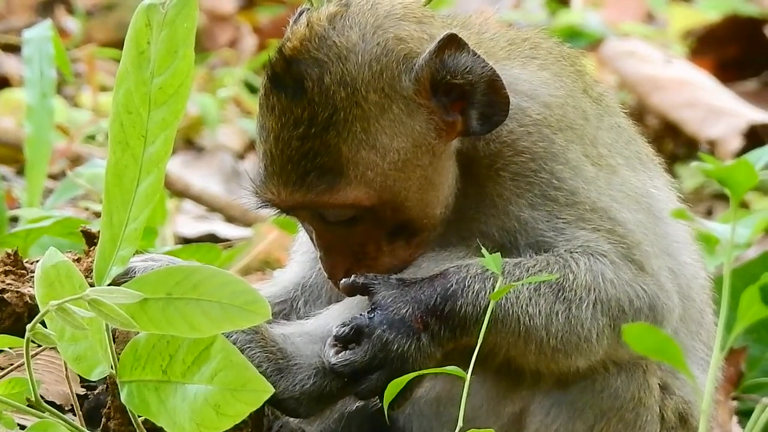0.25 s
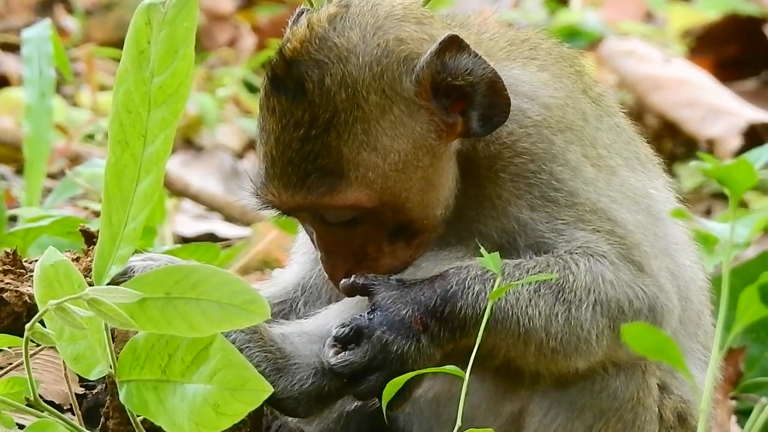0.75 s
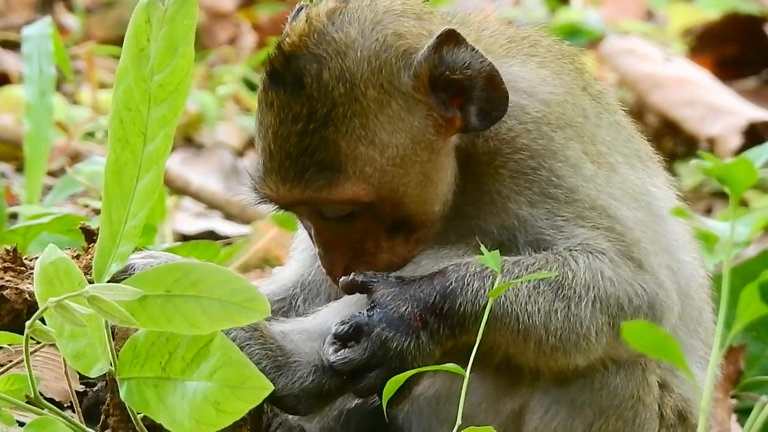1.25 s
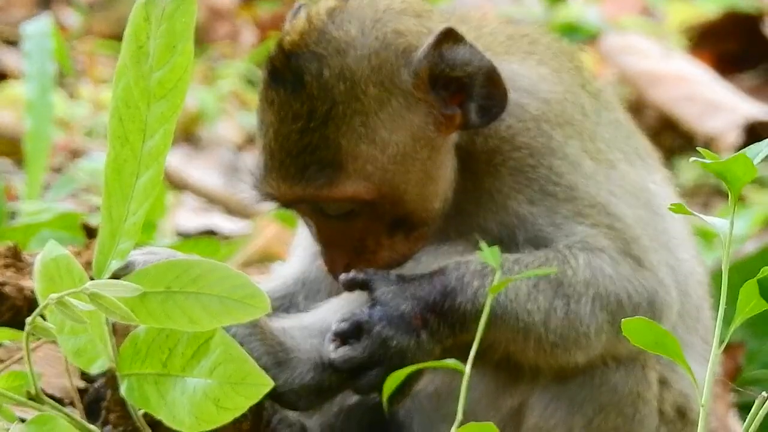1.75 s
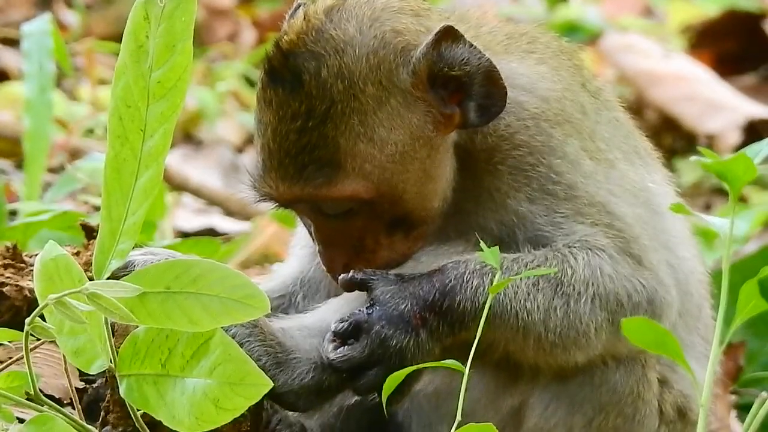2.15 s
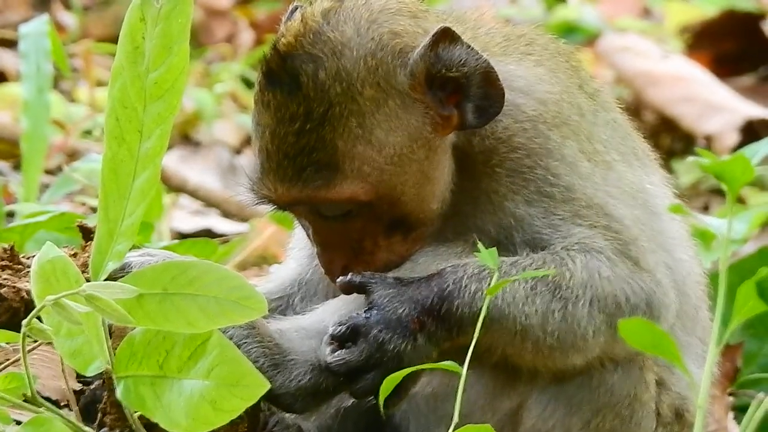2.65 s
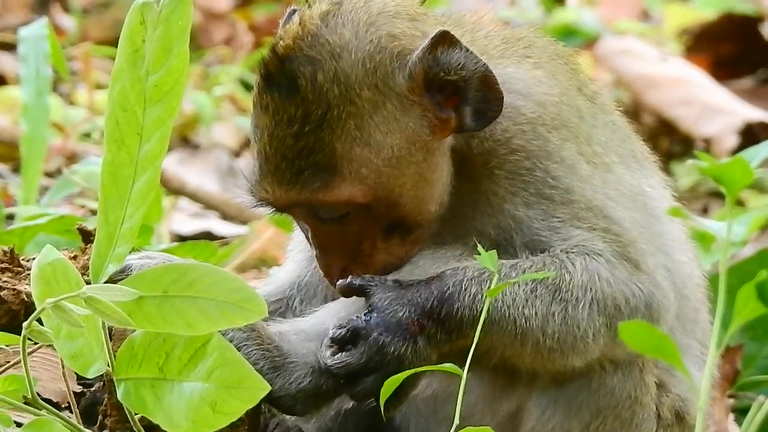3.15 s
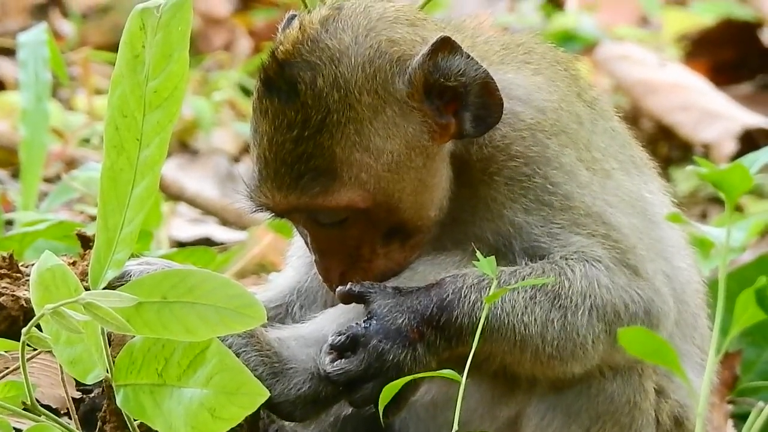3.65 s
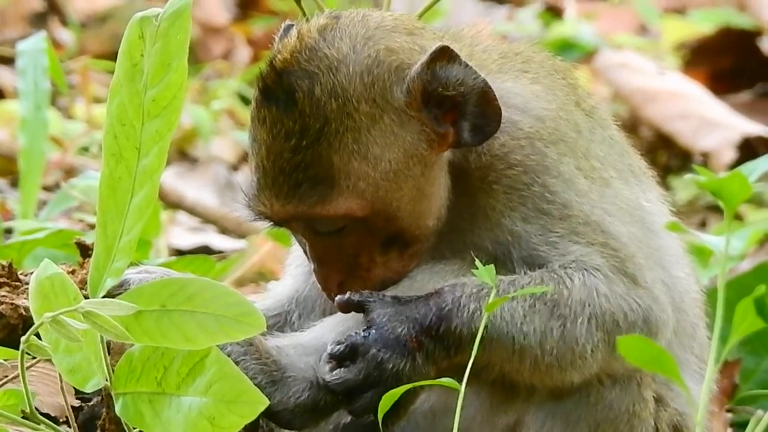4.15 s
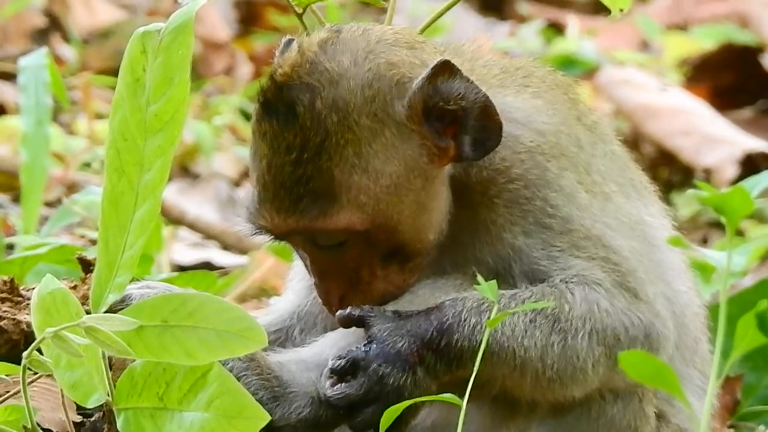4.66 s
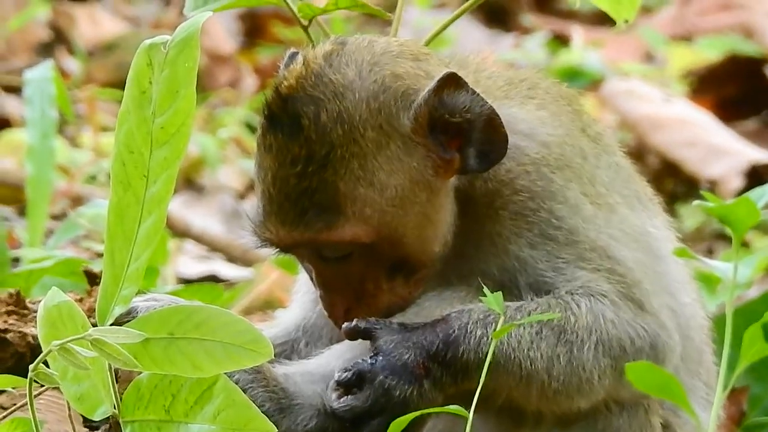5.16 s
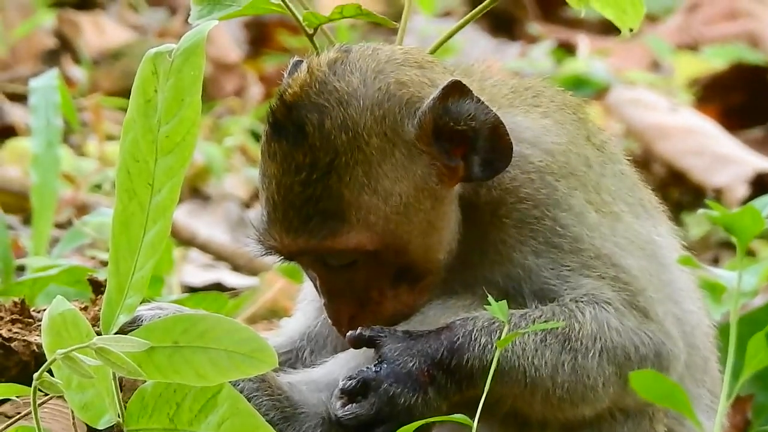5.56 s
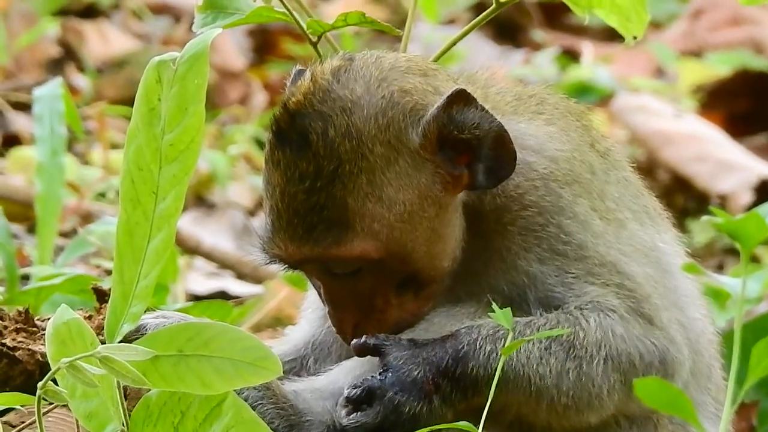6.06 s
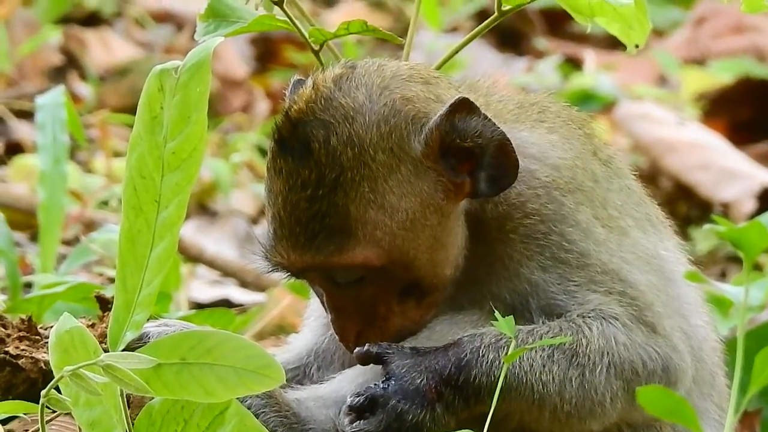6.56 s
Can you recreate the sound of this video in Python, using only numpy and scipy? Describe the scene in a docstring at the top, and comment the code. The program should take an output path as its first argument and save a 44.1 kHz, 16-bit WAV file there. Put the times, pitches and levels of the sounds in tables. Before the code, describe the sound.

In a daytime forest, insects hiss steadily on the right over a low rumble of far traffic and soft air. A thin reedy whine comes twice near the start. Birds give short nasal calls and high peeps throughout, also on the right, lightly echoed by the trees. One brief, dull rustle sounds on the left. A faint engine note comes and goes, and a last nasal call swells twice and sags.

```python
"""A forest floor by day. From the start, an insect chorus hisses near 5 kHz on the right, over far traffic
rumble, a faint drone and a soft wash of air. A thin reedy whine comes twice in the first 1.6 s. From 0.4 s on,
birds give short nasal calls and peeps, also on the right, echoed by the trunks. At 1.8 s a brief dull scuff
sounds on the left. One far engine note, heard at the start, returns at 3.6 and 5.4 s. A last nasal call scoops
up, swells twice and sags."""
import sys
import numpy as np
from scipy import signal
from scipy.fft import rfft, irfft
from scipy.io import wavfile
from scipy.ndimage import uniform_filter1d

SR = 44100
rng = np.random.default_rng(int(sys.argv[2]) if len(sys.argv) > 2 else 0)


def output_pcm(signal):
    """Save a mono or channel-first signal as 16-bit PCM at the path in sys.argv[1].

    Samples are clipped to [-1, 1] before scaling.
    """
    pcm = np.clip(np.atleast_2d(signal).T, -1, 1) * 32767
    wavfile.write(sys.argv[1], SR, np.round(pcm).astype(np.int16))


N = 300011
FREQ_HZ, TIME_S = np.fft.rfftfreq(N, 1 / SR), np.arange(N) / SR

# Insect hiss. Each row: frequency in Hz, relative density in dB.
CHORUS_SPECTRUM = [(2100, -17.5), (2700, -14), (3000, -15), (3450, -11), (3900, -13.5), (4300, -5.5),
                   (4600, -2.5), (4900, 1), (5300, -4.5), (5700, -8.5), (6500, -16.5), (8000, -28),
                   (10000, -40), (15000, -68)]
# Slow chorus trend. Each row: time in seconds, relative level in dB.
CHORUS_TREND = [(0.0, -36.5), (1.21, -35.5), (2.69, -38.5), (6.19, -40.5), (6.8, -37)]
# Swells of high hiss, several of them breathy noise around the bird calls.
# Each row: peak time in seconds, half length in seconds, boost in dB.
HISS_SWELLS = [(.53, 0.073, 3.5), (0.89, 0.043, 1.5), (1.226, 0.039, 3), (2.25, 0.29, 1.6),
               (3.562, 0.27, 2), (4.303, .12, 2), (4.95, 0.047, 2), (5.274, 0.14, 2.5), (6.32, 0.18, 2)]
# Nasal bird calls. Each row: start in seconds, length in seconds, top pitch in Hz, scoop and sag
# as fractions of pitch, relative level in dB, buzz in dB. The last two rows form one call.
NASAL_CALLS = [(0.382, 0.12, 903, 0.00048, 0, -33.5, -9), (.87, 0.14, 819, 0.097, 0.055, -29.5, -3.5),
               (1.07, 0.23, 890, 0.02, .007, -38.5, 4), (1.997, .13, 917, 0.12, 0.016, -35.5, -8),
               (2.27, 0.26, 900, .03, 0.035, -47, -5), (3.178, 0.082, 824, 0.094, .06, -26.5, -22),
               (3.528, 0.19, 888, 0.0026, 0.029, -43, -1), (4.195, 0.15, 883, 0, 0.057, -36.5, -2),
               (4.807, 0.22, 863, .004, .14, -33, -3.5), (5.408, .22, 864, 0.0026, .11, -33.5, -3.5),
               (6.116, 0.23, 857, .045, 0.05, -36.5, -4.5), (6.548, 0.087, 903, .2, 0.043, -30.5, 0),
               (6.607, .14, 872, 0.026, 0.089, -30, 0)]
# Bird throat response. Each row: harmonic number, gain in dB.
THROAT_HARMONICS = [(2, -12), (3, -10.5), (4, -6.3), (5, -17), (6, 0), (7, -22), (8, -19.5), (9, -36),
                    (10, -33.5)]
# Near whistles. Each row: start in seconds, length in seconds, pitch in Hz, level in dB.
NEAR_PEEPS = [(.55, .031, 4120, -29), (.995, 0.057, 3310, -35.5), (1.275, 0.078, 1620, -38.5),
              (1.55, .08, 6420, -63), (2.295, 0.044, 4950, -31), (2.48, 0.11, 6570, -41.5),
              (2.49, 0.15, 2420, -48), (2.785, .06, 5130, -31), (2.995, 0.038, 4720, -29),
              (3.29, .057, 2890, -39.5), (3.29, .045, 4320, -31), (3.425, 0.12, 2600, -40.5),
              (3.98, 0.058, 4790, -32), (4.12, 0.07, 3200, -40), (4.13, 0.037, 4720, -37),
              (5.015, .037, 2800, -39)]
# Faint notes above the chorus. Each row: start in seconds, pitch in Hz.
HIGH_NOTES = [(.74, 9570), (1.32, 9380), (4.77, 9570), (6.0, 9360)]
# Distant birds. Each row: lowest and highest pitch in Hz, peeps per second, relative level in dB.
FAR_BIRD_BANDS = [(2300, 2900, 12, -53), (3100, 3750, 15, -52), (4450, 5350, 17, -44.5)]
# Whine partials. Each row: frequency in Hz, width in Hz, gain in dB.
WHINE_PARTIALS = [(2775, 30, 0), (3240, 40, -13), (3560, 50, -11), (3712, 30, -3.5), (4167, 26, -.5)]
# Whine pulses, two bouts. Each row: peak time in seconds, level in dB.
WHINE_PULSES = [(.02, -38), (.25, -34), (.37, -44), (.56, -42), (1.165, -33), (1.31, -42), (1.495, -34)]
# Traffic rumble. Each row: frequency in Hz, relative density in dB.
RUMBLE_SPECTRUM = [(20, -54), (36, -56), (48, -63), (60, -12), (84, -17.5), (100, -9.5), (118, -1.5),
                   (140, -1.5), (175, 3), (215, -5.5), (260, -8.5), (330, -11), (420, -67), (800, -90)]
# One far engine. Each row: start in seconds, length in seconds, pitch in Hz, level in dB.
ENGINE_NOTES = [(-.3, 1.13, 321, -50), (3.606, 1.2, 302, -50), (5.35, 1.5, 301, -49.5)]
# Traffic drone. Each row: frequency in Hz, width in Hz, left and right mid-scene level in dB.
DRONE_TONES = [(145.9, 16.6, -47, -45.5), (369.6, 14, -59, -61.5), (647, 32, -55.5, -65),
               (808, 45, -58.5, -57.5), (1046, 34, -62, -50.5), (1164, 17, -62, -62), (1267, 14, -61, -59),
               (1365, 71, -60.5, -57.5), (1804, 40, -65.5, -60)]
# Air wash. Each row: frequency in Hz, left and right relative density in dB.
AIR_SPECTRUM = [(20, -112, -110), (90, -75, -105), (200, -68.5, -65.5), (320, -72, -69), (470, -79.5, -70),
                (680, -75.5, -66.5), (920, -81, -70), (1220, -84, -68), (1950, -89.5, -70.5),
                (1890, -98, -77), (2670, -96, -96.5), (5030, -96.5, -104), (10640, -104, -103),
                (15600, -112, -112)]


def insect_chorus(level_db=6, patch_db=1.5, throb_db=.44):
    """Insects blend to a hiss, single singers as patches. Several swells are the bird calls' breath."""
    hz, _, bins = signal.stft(rng.standard_normal(N), SR, nperseg=512, noverlap=384)
    patches = uniform_filter1d(rng.standard_normal(bins.shape), size=4, axis=0)
    patches = unit_rms(uniform_filter1d(patches, size=14, axis=1))
    bins = bins * gain(spectrum_db(CHORUS_SPECTRUM, hz)[:, None] + patch_db * patches)
    hiss = unit_rms(signal.istft(bins, nperseg=512, noverlap=384)[1][:N])
    trend_db = np.interp(TIME_S, *np.transpose(CHORUS_TREND))
    swell_db = sum(db * np.exp(-((TIME_S - peak_s) / half_s) ** 2)
                   for peak_s, half_s, db in HISS_SWELLS)
    return gain(level_db + trend_db + swell_db + throb_db * wander(20)) * hiss


def nasal_calls(level_db=1.6, scoop_s=.019, jitter=.003, flutter_db=1.5, treble_db_per_hz=.013):
    """Bird calls scoop up, swell and sag. Even harmonics lead; all flutter through the leaves."""
    out, waver = np.zeros(N), wander(87)
    flutters = [wander(59) for _ in THROAT_HARMONICS]
    for start_s, length_s, top_hz, scoop, sag, db, buzz_db in NASAL_CALLS:
        t = np.arange(round(length_s * SR)) / SR
        progress, span = t / length_s, sample_span(start_s, len(t))
        drop = sag * progress ** 3.7
        pitch_hz = top_hz * (1 - scoop * np.exp(-t / scoop_s) - drop + jitter * waver[span])
        phase = phase_rad(pitch_hz)
        effort_db = db - 6.5 * (2 * (progress - .45)) ** 2
        low_db = .52 * (-35.5 - effort_db)  # softer is duller
        voice = 0
        for (k, throat_db), flutter in zip(THROAT_HARMONICS, flutters):
            # Top harmonics gain as they sink towards the throat's peak.
            high_db = buzz_db / 2 + treble_db_per_hz * k * top_hz * drop
            harmonic_db = throat_db + buzz_db * (k % 2) + low_db * (k < 5) + high_db * (k > 7)
            voice += gain(harmonic_db + flutter_db * flutter[span]) * np.sin(k * phase)
        envelope = gain(level_db + effort_db) * gate(t, length_s, ramp_s=.025)
        add(out, start_s, np.sqrt(2) * envelope * voice)
    return out


def peeps(rows, sag_per_s, scoop=0, jitter=.008):
    """Small birds whistle short, unsteady sines; the final pitch drop grows with length."""
    out, waver = np.zeros(N), wander(310)
    for start_s, length_s, hz, db in rows:
        count = round(length_s * SR)
        progress = np.linspace(0, 1, count)
        bend = scoop * (1 - progress) ** 4 + sag_per_s * length_s * progress ** 2
        pitch_hz = hz * (1 - bend + jitter * waver[sample_span(start_s, count)])
        whistle = np.sqrt(2) * np.sin(phase_rad(pitch_hz))
        add(out, start_s, gain(db) * whistle * signal.windows.tukey(count, .7))
    return out


def whine(rise_s=.022, fade_s=.1, tone_share=.42):
    """Wavering, fuzzy high partials swell and fade together on each pulse."""
    envelope = sum(gain(db) * np.exp(np.minimum((TIME_S - peak_s) / rise_s, (peak_s - TIME_S) / fade_s))
                   for peak_s, db in WHINE_PULSES)
    partials = 0
    for hz, width_hz, db in WHINE_PARTIALS:
        tone = np.sqrt(2) * np.sin(phase_rad(hz + width_hz / 2 * wander(37)))
        fuzz = narrow_noise(hz, 2.1 * width_hz)
        partials += gain(db) * (np.sqrt(tone_share) * tone + np.sqrt(1 - tone_share) * fuzz)
    return envelope * partials


def scuff_noise(start_s=1.8, length_s=.055, band_hz=(250, 1500), level_db=-35.5):
    """One dull scuff of band noise."""
    out, count = np.zeros(N), round(length_s * SR)
    bandpass = signal.butter(8, band_hz, "band", fs=SR, output="sos")
    scuff = unit_rms(signal.sosfilt(bandpass, rng.standard_normal(count)))
    envelope = signal.windows.tukey(count, .4) * np.linspace(1, .5, count)
    add(out, start_s, gain(level_db) * envelope * scuff)
    return out


def far_birds(shortest_s=.027, longest_s=.104, spread_db=8, level_db=-1):
    """Faint arched peeps at random times, deeper in the wood."""
    rows = []
    for low_hz, high_hz, per_s, db in FAR_BIRD_BANDS:
        for when, length, pitch, loudness in rng.random((400, 4))[:round(per_s * N / SR)]:
            length_s = shortest_s + (longest_s - shortest_s) * length
            hz = low_hz + (high_hz - low_hz) * pitch
            rows.append((when * N / SR, length_s, hz, level_db + db + spread_db * (loudness - .5)))
    return peeps(rows, sag_per_s=.6, scoop=.06, jitter=.012)


def traffic(rumble_db=-42, lump_db=1.2, jitter=.00962, nearing_db_per_s=.4):
    """Far engines: lumpy rumble, one intermittent note, a slowly growing drone."""
    rumble = unit_rms(irfft(white_spectrum() * gain(spectrum_db(RUMBLE_SPECTRUM, FREQ_HZ)), N))
    rumble *= gain(rumble_db + lump_db * wander(1.7))
    clock_s = np.cumsum(1 + jitter * wander(8.6)) / SR
    note = sum(gain(db) * gate(TIME_S - start_s, length_s, ramp_s=.29) * np.sin(2 * np.pi * hz * clock_s)
               for start_s, length_s, hz, db in ENGINE_NOTES)
    note *= np.sqrt(2) * gain(1.5 * wander(4.8))
    drone = sum(gain([[left_db], [right_db]]) * lag_left(narrow_noise(hz, width_hz))
                for hz, width_hz, left_db, right_db in DRONE_TONES)
    drone *= gain(nearing_db_per_s * (TIME_S - TIME_S.mean()))
    return lag_left(rumble + note) + drone


def air(coherence=.2, lag_rad=1.3, level_db=.2, swell_db=.3):
    """Soft, wide noise wash, duller on the left."""
    right = white_spectrum()
    left = coherence * np.exp(-1j * lag_rad) * right + np.sqrt(1 - coherence ** 2) * white_spectrum()
    sides = [irfft(side * gain(spectrum_db(AIR_SPECTRUM, FREQ_HZ, column)), N)
             for column, side in ((1, left), (2, right))]
    return np.sqrt(SR / 2) * np.array(sides) * gain(level_db + swell_db * wander(1))


def trunk_echoes(x, t60_s=.45, gap_s=.012, taps_per_s=2000):
    """Trunks scatter a sparse, decaying tail."""
    t = np.arange(SR) / SR
    taps = rng.standard_normal(SR) * (rng.random(SR) < taps_per_s / SR)
    taps *= (t > gap_s) * gain(-60 * t / t60_s)
    return signal.fftconvolve(x, taps / np.linalg.norm(taps))[:N]


def lag_left(x, lag_rad=1.22):
    """Stereo pair, left phase lagging."""
    return np.array([irfft(rfft(x) * np.exp(-1j * lag_rad), N), x])


def narrow_noise(hz, width_hz):
    """Noise in one resonance, unit RMS."""
    return unit_rms(irfft(white_spectrum() / (1 + ((FREQ_HZ - hz) / (.59 * width_hz)) ** 2), N))


def wander(rate_hz):
    """Smooth random curve, unit RMS."""
    return unit_rms(irfft(white_spectrum() * np.exp(-(FREQ_HZ / rate_hz) ** 2), N))


def gate(t, length_s, ramp_s):
    """Smooth rise, hold, smooth fall."""
    rise = np.sin(np.pi / 2 * np.clip(t / ramp_s, 0, 1)) ** 2
    fall = np.sin(np.pi / 2 * np.clip((length_s - t) / ramp_s, 0, 1)) ** 2
    return rise * fall


def spectrum_db(rows, hz, column=1):
    """Table column interpolated over log frequency."""
    rows = np.asarray(rows)
    return np.interp(np.log(hz + 1), np.log(rows[:, 0] + 1), rows[:, column])


def white_spectrum():
    return rfft(rng.standard_normal(N))


def phase_rad(hz):
    return 2 * np.pi * np.cumsum(hz) / SR


def gain(db):
    return 10 ** (np.asarray(db) / 20)


def unit_rms(x):
    return x / np.sqrt(np.mean(abs(x) ** 2) + 1e-20)


def sample_span(start_s, count):
    return (round(start_s * SR) + np.arange(count)) % N


def add(mix, start_s, sound):
    part = mix[round(start_s * SR):][:len(sound)]
    part += sound[:len(part)]


def scene(near_echo_db=-12.5, far_echo_db=.5, wildlife_left_db=-39, whine_left_db=-31):
    """Wildlife and whine right, their faint echoes and the scuff left, traffic and air all round."""
    high_notes = peeps([(start_s, .12, hz, -65) for start_s, hz in HIGH_NOTES], sag_per_s=0)
    near = nasal_calls() + peeps(NEAR_PEEPS, sag_per_s=.58) + high_notes
    near += gain(near_echo_db) * trunk_echoes(near)
    hiss, far = insect_chorus(), far_birds()
    far += gain(far_echo_db) * trunk_echoes(far)
    wildlife = hiss + near + far
    reedy, scuff = whine(), scuff_noise()
    spill = gain(wildlife_left_db) * wildlife + gain(whine_left_db) * reedy
    left = trunk_echoes(spill, t60_s=.2) + scuff
    return np.array([left, wildlife + reedy]) + traffic() + air()


def record(dry):
    """Steep low-pass at 15.7 kHz."""
    lowpass = signal.firwin(511, 15700, window=("kaiser", 9), fs=SR)
    return signal.oaconvolve(dry, lowpass[None], "same")


dry = scene()
out = record(dry)
output_pcm(out)
```